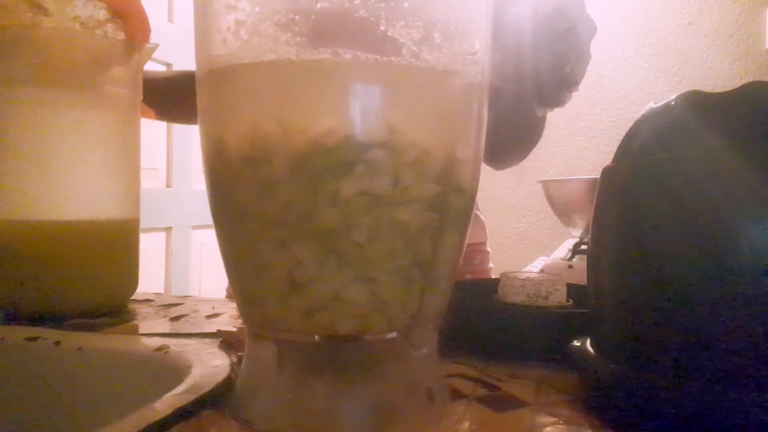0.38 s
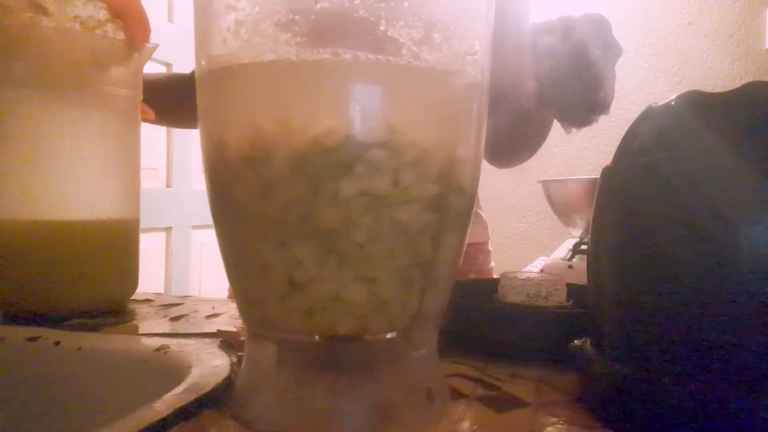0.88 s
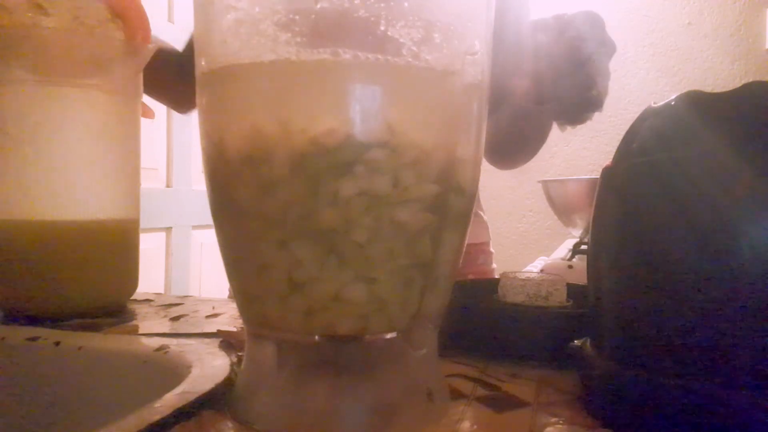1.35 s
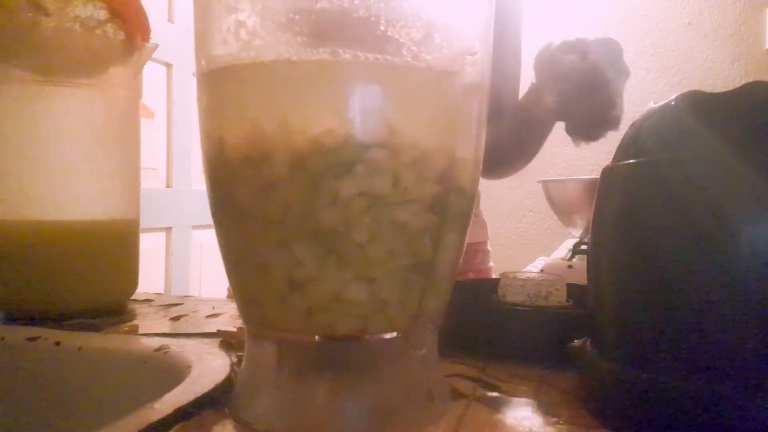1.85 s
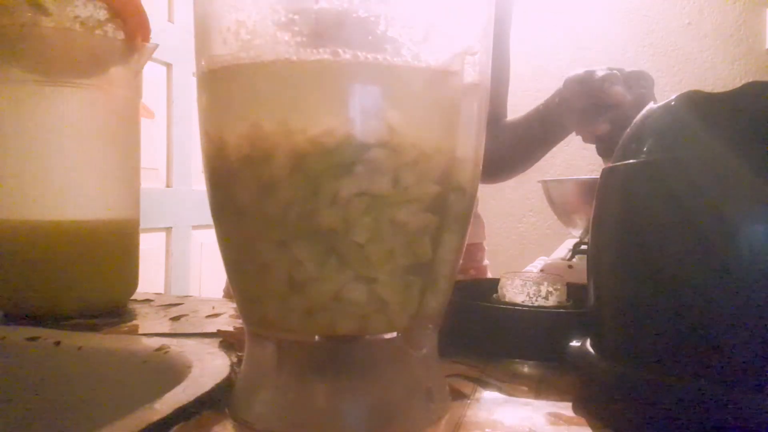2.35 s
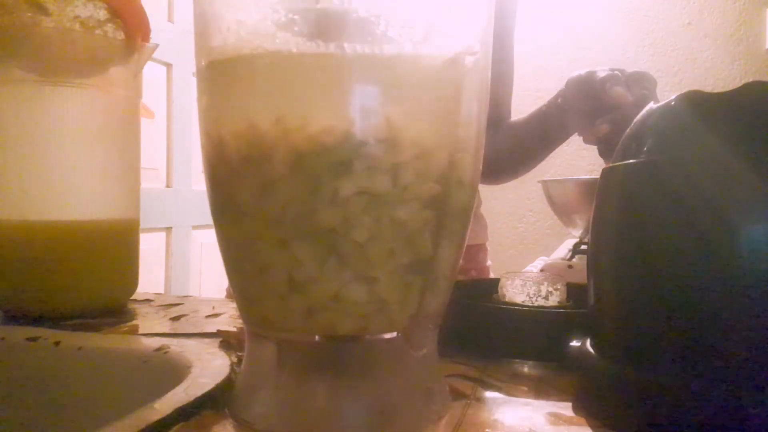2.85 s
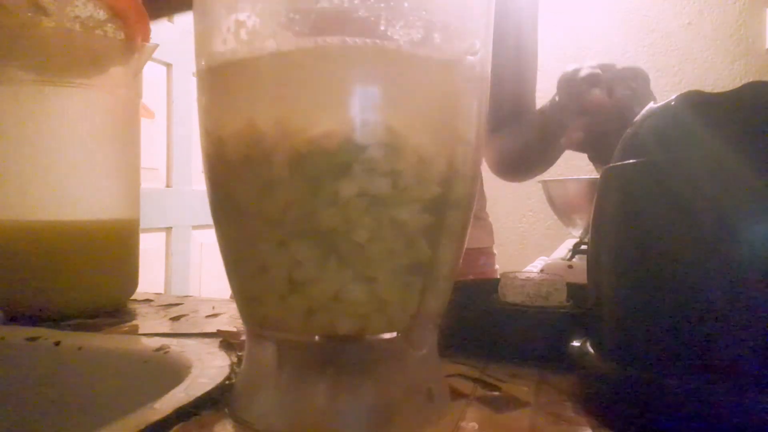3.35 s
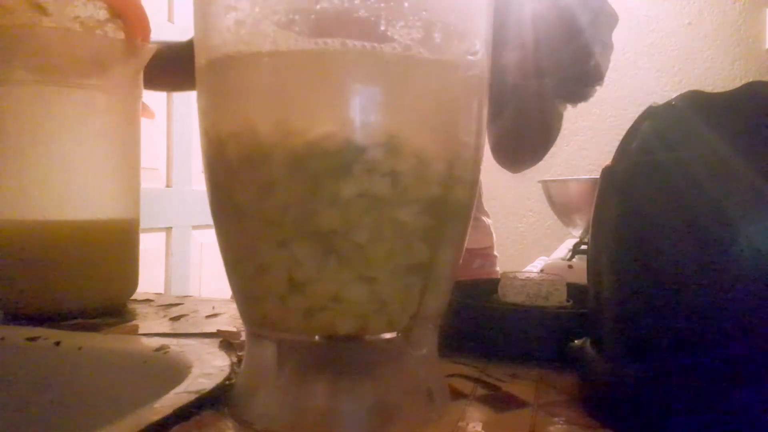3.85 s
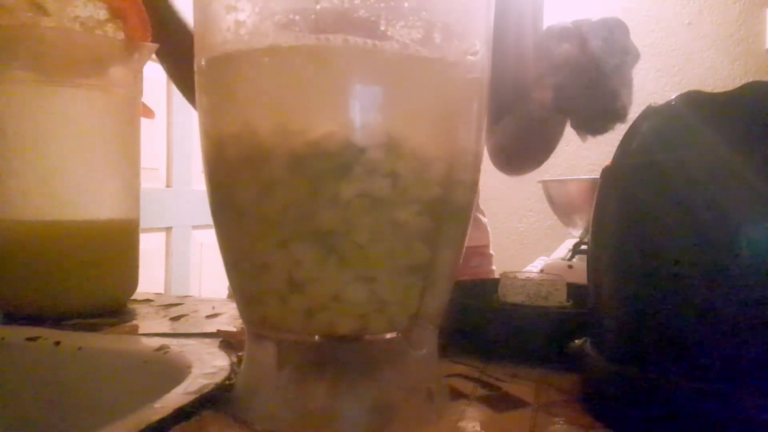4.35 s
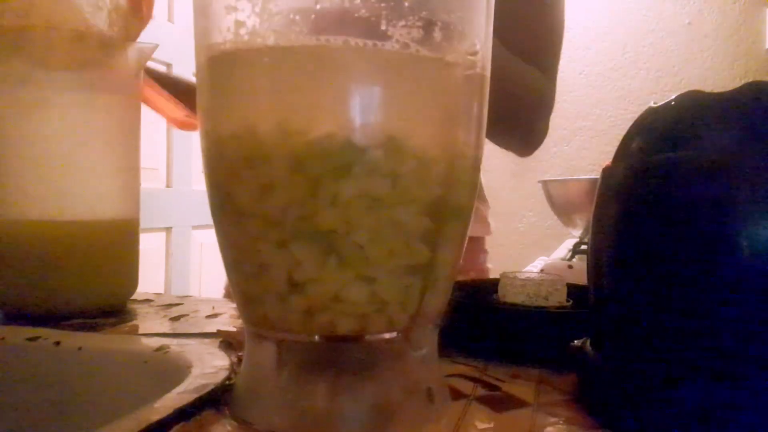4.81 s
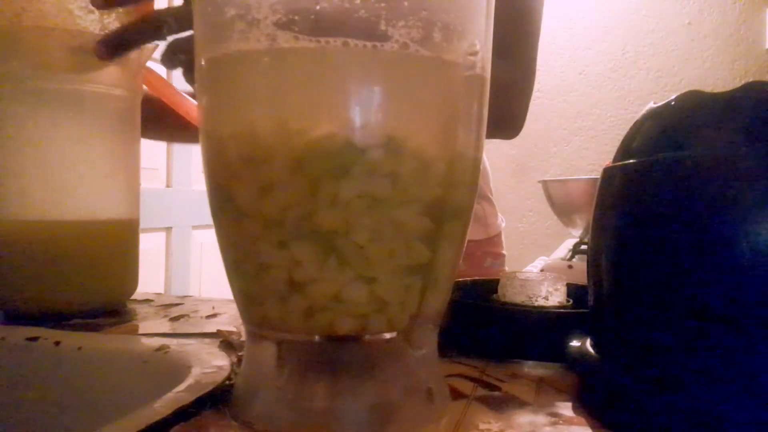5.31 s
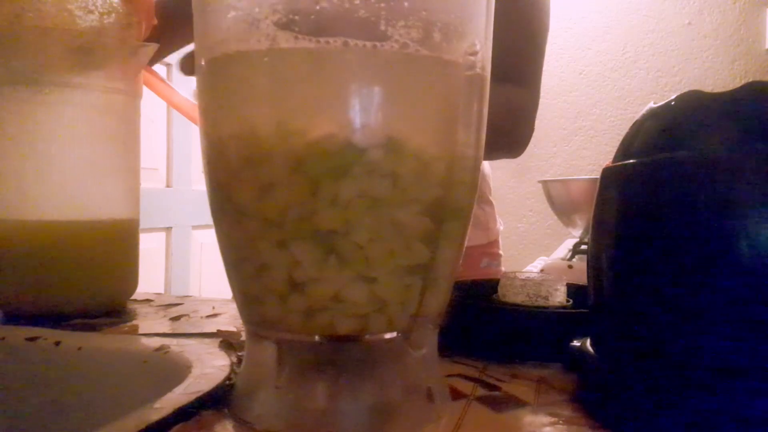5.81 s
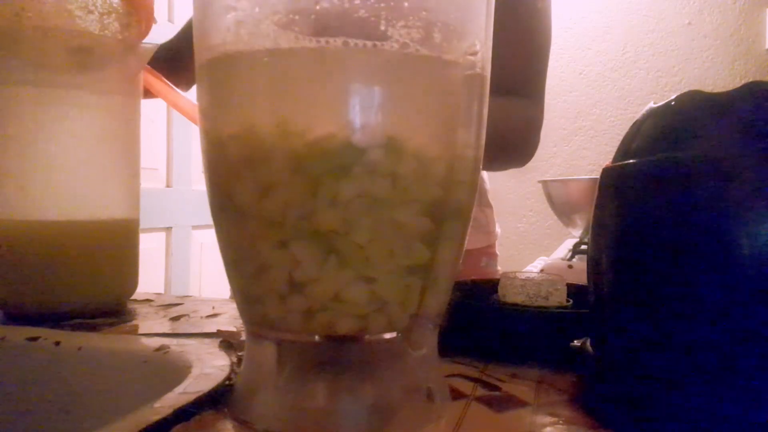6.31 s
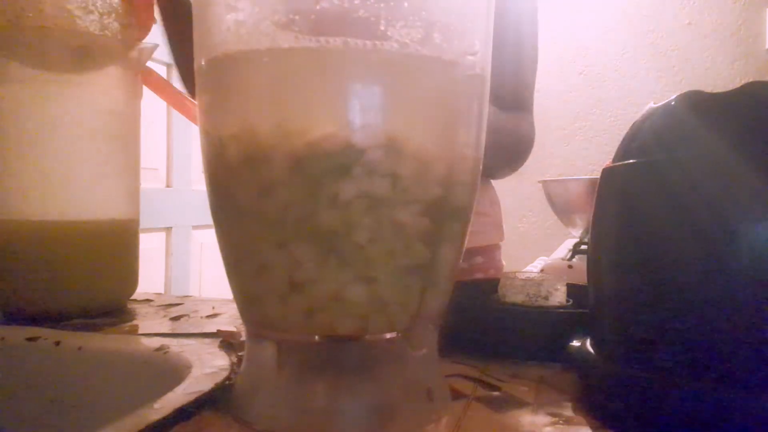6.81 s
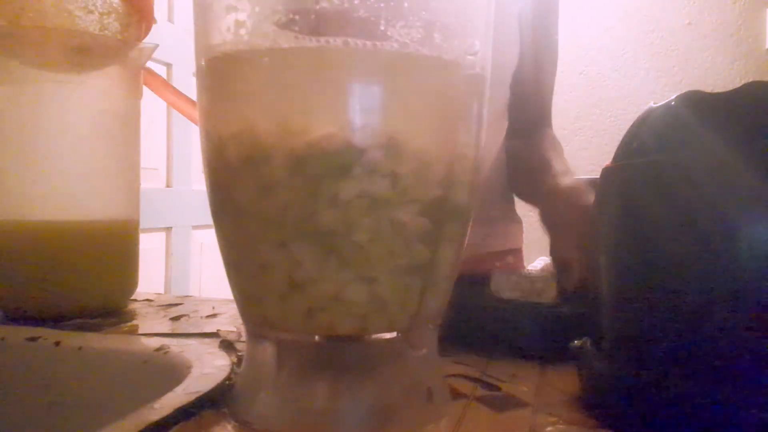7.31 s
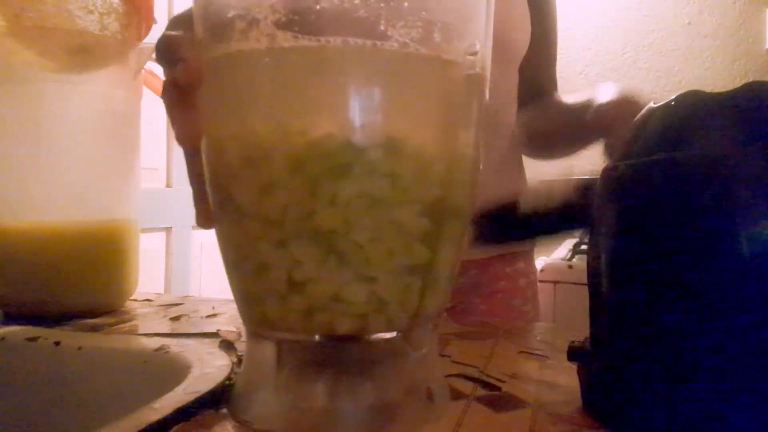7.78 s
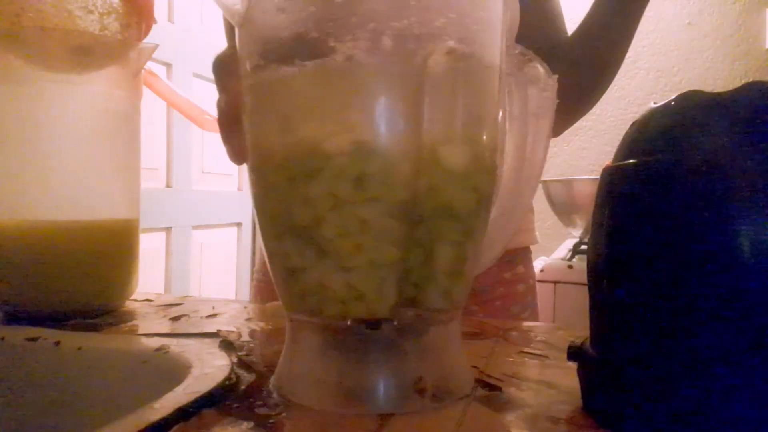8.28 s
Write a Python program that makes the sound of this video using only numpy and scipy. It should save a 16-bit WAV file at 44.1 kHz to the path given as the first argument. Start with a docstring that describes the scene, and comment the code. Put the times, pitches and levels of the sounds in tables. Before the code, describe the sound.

Objects handled on a counter in a small kitchen, picked up by a close microphone with automatic level. Constant dull room rumble and thin hiss. Faint ticks and one soft knock lead to hard thuds, cracks and rattles in the middle, thinning into separate clicks. Another brief scrape and rattle follows, then a bright hollow plastic knock, a duller one, a light rustle and final tiny ticks.

```python
"""A kitchen counter close up: a low, broad room rumble under a faint hiss while hands move a jar, a spoon and a lid.
Blows ring decaying counter modes, thumps two deep ones; contacts click as noise cracks with short modes.
Small parts tick and rattle, friction noise scrapes, and a blender lid of hollow plastic modes knocks twice.
An automatic gain sinks after the loudest blows and creeps back."""
import sys
import numpy as np
from scipy import signal
from scipy.fft import rfft, irfft
from scipy.io import wavfile
from scipy.ndimage import uniform_filter1d

SR = 44100
rng = np.random.default_rng(int(sys.argv[2]) if len(sys.argv) > 2 else 0)


def log_audio(samples):
    """Write samples as a 16-bit WAV file to the path given in sys.argv[1]."""
    # one column per channel
    frames = np.atleast_2d(samples).T
    # limit to full scale, then quantise
    limited = np.clip(frames, -1, 1)
    pcm = np.round(limited * 32767).astype(np.int16)
    wavfile.write(sys.argv[1], SR, pcm)


def volts(x):
    """Linear amplitude factor 10**(x/20) for a level x in dB, scalar or array-like."""
    e = np.asarray(x, float) / 20
    return 10 ** e


N = 381906
T = np.arange(N) / SR
HZ = np.fft.rfftfreq(N, 1 / SR)[1:]

# counter modes: mode_hz, level_db, share of the blow's t60 (ratio)
COUNTER_MODES = [(144, -7, 3), (243, 8.5, 0.4), (285, 5, 1.08), (318, 2, 1.73), (379, 7.5, 0.54),
                 (460, 2.5, 1.14), (560, -1, 0.27), (804, -6.5, 0.59)]
# jar modes, heard in the rattle after contacts: mode_hz, level_db
JAR_MODES = [(900, -8), (1100, -8), (1290, -9.5), (1850, -10), (2150, -12.5), (2480, -13.5), (2800, -12.5),
             (4900, -34)]


def read(table, hz):
    """Table of (Hz, value) read on a log-frequency axis."""
    at, value = np.transpose(table)
    return np.interp(np.log(hz), np.log(at), value)


def unit(x):
    """Scale to rms 1."""
    return x / np.sqrt(np.mean(x ** 2))


def band(x, lo_hz, hi_hz):
    """Band-pass, rms 1."""
    sos = signal.butter(2, [lo_hz, min(hi_hz, 0.49 * SR)], "band", fs=SR, output="sos")
    return unit(signal.sosfilt(sos, x))


def walk(rate_hz):
    """Random levels held 1 / rate_hz and slewed twice, rms 1."""
    hold = int(SR / rate_hz)
    steps = np.repeat(rng.standard_normal(N // hold + 1), hold)
    return unit(uniform_filter1d(uniform_filter1d(steps, hold), hold)[:N])


def sides(pan_db):
    """Left and right gains; pan_db is left minus right."""
    return volts(np.array([[pan_db / 2], [-pan_db / 2]]))


def add(out, start_s, sound):
    """Mix a short sound in at start_s."""
    i = int(start_s * SR)
    out[:, i:i + sound.shape[1]] += sound[:, :N - i]


def ring(hz, t60_s, phase_rad, t):
    """One mode decaying exponentially, t60 at least 5 ms."""
    return np.sin(2 * np.pi * hz * t + phase_rad) * 1000.0 ** (-t / np.maximum(t60_s, 0.005))


def blows():
    """Each blow favours the counter modes near one pitch; a soft push delays the swell."""
    # start_s, level_db, favoured_hz, t60_s (before mode share and choke), push_s
    blow_table = [(2.668, -8.5, 495, 0.11, 0.0024), (3.911, -11.5, 285, 0.12, .0046),
                  (3.957, -16.5, 460, 0.088, 0.0041), (3.993, -16.5, 440, 0.083, 0.0037),
                  (4.028, -17, 390, 0.076, 0.0033), (4.044, -18, 405, 0.1, 0.0033),
                  (4.057, -14.5, 440, 0.042, .003), (4.079, -3.5, 280, 0.087, 0.012),
                  (4.11, -18, 285, 0.1, 0.0045), (4.144, -13.5, 283, 0.15, 0.011),
                  (4.187, -17, 318, 0.11, 0.0071), (4.443, -1.2, 369, 0.14, 0.0014),
                  (4.459, -2, 296.4, 0.14, 0.0048), (4.555, -16, 324, 0.089, .004),
                  (4.7806, 2.5, 293, 0.09, 0.0013), (4.792, 2, 331, 0.13, 0.011),
                  (4.805, -3, 348, 0.08, 0.0033), (4.852, -2.5, 318, 0.12, 0.0088),
                  (4.908, 2, 320, 0.12, 0.0072), (4.921, -11.5, 440, 0.093, 0.0034),
                  (4.965, -13, 328, 0.26, 0.0068), (5.007, -9.5, 320, 0.15, 0.0017),
                  (5.073, -14, 500, 0.095, 0.0024), (5.1372, -10.5, 430, 0.18, 0.0015),
                  (6.038, -7, 308, 0.18, 0.0045), (6.501, -9.5, 352, 0.085, 0.003),
                  (6.512, -6.5, 306, 0.066, 0.0029), (6.547, -14, 294, 0.11, 0.0027),
                  (7.575, -15, 329, 0.088, 0.0066), (7.606, -21, 295, 0.066, 0.0051),
                  (8.095, -21.5, 266, 0.12, 0.0022)]
    left_lead_s = 0.00016  # as mode phase
    out, t = np.zeros((2, N)), T[:SR // 2]
    hz, mode_db, share = np.transpose(COUNTER_MODES)[:, :, None]
    chance = rng.standard_normal((len(blow_table), len(COUNTER_MODES), 1))
    for (start_s, db, near_hz, t60_s, push_s), c in zip(blow_table, chance):
        reach_db = np.maximum(-80 * np.abs(np.log2(hz / near_hz)), -18)
        gain = volts(mode_db + reach_db)
        tuned_hz = hz * (1 + 0.0047 * c)
        sound = np.array([np.sum(gain * ring(tuned_hz, t60_s * share, 2 * np.pi * hz * lead_s, t), axis=0)
                          for lead_s in (left_lead_s, 0)])
        swell = 1 - np.exp(-t / push_s)
        # the hand stays on the piece and chokes the ring
        choke = 0.22 + np.exp(-(t / (0.31 * t60_s)) ** 2)
        sound = sound * swell * choke
        add(out, start_s, volts(db) * sides(-5.0) * sound / np.abs(sound).max())
    return out


def thumps():
    """Something heavy is set down: two deep modes near 74 and 135 Hz, slow to swell."""
    # start_s, level_db, 74 Hz mode over the 135 Hz mode (db)
    thump_table = [(2.668, -12, -24), (4.442, -8.5, -22), (4.783, -5, -10.5), (5.007, -20, 0.5),
                   (6.549, -28, -1), (7.576, -33, 1), (8.096, -13, -14)]
    out, t = np.zeros((2, N)), T[:SR // 2]
    swell = 1 - np.exp(-(t / 0.0036) ** 2)
    for (start_s, db, deep_db), c in zip(thump_table, rng.standard_normal((len(thump_table), 2))):
        deep = volts(deep_db) * ring(74 * (1 + 0.051 * c[0]), 1.0, 0, t)
        upper = ring(135 * (1 + 0.032 * c[1]), 0.22, 0, t)
        add(out, start_s, volts(db) * sides(-4.0) * (deep + upper) * swell)
    return out


def lid():
    """Hollow plastic modes, out of step at the two ports, with a short room tail."""
    # start_s, level_db, bright_db (per octave above 800 Hz), left minus right (db)
    knock_table = [(7.384, 0, -0.5, -5), (7.575, -5, -16, -5.5)]
    # mode_hz, level_db (before brightness), t60_s (before damping)
    lid_modes = [(560, -8, .018), (720, 0, .016), (880, -19, .07), (960, -3, .014), (1200, -8, .014),
                 (1450, -12, .014), (1960, -16, .035), (2830, -24, .015), (6800, -42, .02)]
    out, t = np.zeros((2, N)), T[:SR // 4]
    hz, mode_db, t60_s = np.transpose(lid_modes)[:, :, None]
    chance = rng.standard_normal((len(knock_table), 2, len(t)))
    for (start_s, db, bright_db, pan_db), c in zip(knock_table, chance):
        gain = volts(mode_db + bright_db * np.maximum(np.log2(hz / 800), 0))
        # a dull, soft contact also damps the ring and slows the onset
        held_s = t60_s * volts(bright_db / 8)
        onset = 1 - np.exp(-(t * volts(bright_db / 4) / 0.001) ** 2)
        sound = np.array([np.sum(gain * ring(hz, held_s, lag_rad, t), axis=0) for lag_rad in (1.6, 0)])
        sound = sound * onset
        tail = volts(-24 + bright_db / 2) * band(c, 750, 1400) * 1000.0 ** (-t / 0.25)
        add(out, start_s, volts(db) * sides(pan_db) * (sound / np.abs(sound).max() + tail))
    return out


def clicks():
    """Hard contacts: a crack with a noisy tail in three bands and a short mode cluster of the touched piece."""
    # start_s, level_db, ring_hz, ring_db (re level), top_octave_db (re level)
    click_table = [(1.084, -49, 2410, 9, -3), (1.28, -36.5, 1760, -9, -4), (1.586, -42, 8850, 7, -8),
                   (1.79, -45, 9100, 9, -10), (1.862, -35.5, 5000, -11, -1), (2.099, -36.5, 1640, -20, 1),
                   (2.25, -38.5, 5160, 0, -10), (2.531, -47, 2630, 10, 1), (2.612, -40.5, 2880, 6, -2),
                   (2.615, -34, 1053, 7.5, -10), (2.661, -34.5, 6130, 6, -2), (2.668, -25, 3020, -20, 8),
                   (2.754, -40, 4130, 1, 0), (2.9971, -40.5, 2780, -1, -7), (3.0554, -35, 4940, -3, -3),
                   (3.114, -36.5, 1570, -17, -1), (3.903, -36, 2670, -2, 2), (3.96, -25.5, 6040, 4, -2.2),
                   (3.995, -33, 4500, 2, -1), (4.049, -24, 4900, -14, -10), (4.0526, -30, 3000, -3, -1),
                   (4.077, -28, 2550, -6, 2), (4.17, -40, 1630, -4, 4), (4.441, -12.5, 2500, -30, -6),
                   (4.447, -17.5, 3000, -27, -9), (4.5213, -29.5, 4100, -4, -1),
                   (4.78, -13.5, 1767, -12, 2), (4.803, -28, 790, 6, -20), (4.8512, -32, 1600, 6, -15),
                   (4.939, -30, 1270, 6, -20), (4.974, -32.5, 1230, 0.5, -3), (4.9066, -21, 2100, 4, 2.5),
                   (4.909, -30, 1220, 8, -20), (5.008, -24.5, 1860, -10, -3.5), (5.0744, -22, 2252, -3, -3),
                   (5.133, -17, 4000, -16, 2), (5.136, -27, 5180, 6, -8), (5.166, -24, 1900, -2, -12),
                   (5.2027, -23.5, 2470, 2.5, -10), (5.261, -42, 5230, 2, -10), (5.312, -34, 4330, -4, -8),
                   (5.338, -29, 2390, 2.5, -41), (5.5, -24.5, 5660, 4.5, 0), (5.8162, -30.5, 2020, -9, -2),
                   (6.0367, -23, 2440, 3, -16), (6.416, -26, 6730, -7, 7), (6.445, -35, 11500, 0, 6),
                   (6.47, -29, 2905, -16, 6), (6.478, -35.5, 2850, 10.5, -6), (6.48, -35, 5000, 7, -6),
                   (6.499, -34, 2860, 11, -6), (6.511, -19, 4760, -8, -4), (6.6159, -36.5, 2300, 0, -14),
                   (7.662, -37, 1670, -1.5, -23), (7.875, -38, 5100, -2, -12),
                   (8.432, -26.5, 4600, -28, -5), (8.522, -43, 5100, 4, 5)]
    tail_t60_s = 0.22
    low_db_at_2k, low_db_per_octave = 2, -5.5  # smaller pieces have less low body
    body_db_per_octave = -7  # above 2.5 kHz ring pitch
    size = SR // 2
    out, t = np.zeros((2, N)), T[:size]
    chance = rng.standard_normal((len(click_table), 4, 2, size))
    spread = rng.standard_normal((len(click_table), 4, 1, 1))
    chatter = volts(3.0 * walk(200.0))  # the piece chatters as it settles
    lag_rad = np.array([[1.8], [0]])  # the ports hear the modes out of step
    tail = 1000.0 ** (-t / tail_t60_s)
    onset = 1 - np.exp(-t / 0.00058)
    for (start_s, db, hz, ring_db, top_db), c, off in zip(click_table, chance, spread):
        i = int(start_s * SR)
        crack = 0.44 * tail * np.resize(chatter[i:i + size], size) + 0.52 * np.exp(-t / 0.0036)

        body = 0.74 * band(c[0], 1050, 6240)
        for jar_hz, jar_db in JAR_MODES:
            body = body + volts(jar_db) * band(c[0], 0.97 * jar_hz, 1.03 * jar_hz)
        body = body * volts(body_db_per_octave * max(np.log2(hz / 2500), 0))
        body = body + 0.57 * band(c[3], 0.74 * hz, 1.5 * hz)
        low = volts(low_db_at_2k + low_db_per_octave * np.log2(hz / 2000)) * band(c[1], 330, 1600)
        top = volts(top_db) * band(c[2], 10340, 14400) * tail ** 0.5
        noise = body + low + top

        short_s = 0.25 * tail_t60_s * min(2500 / hz, 1)  # high modes die sooner
        near = np.sum(ring(hz * (1 + 0.06 * off), short_s, lag_rad + 3 * off, t), axis=0)
        cluster = ring(hz, short_s, lag_rad, t) + 0.85 * near
        buzz = 0.26 * band(c[3], 0.89 * hz, 1.12 * hz) * tail  # the piece buzzes on near its pitch
        cluster = 2 * cluster / np.abs(cluster).max() + buzz
        add(out, start_s, volts(db) * sides(-2.3) * (crack * noise + volts(ring_db) * cluster) * onset)
    return out


def ticks():
    """Dry ticks of small hard parts: a 5 ms ring near one pitch with a short bright crack."""
    # start_s, level_db, pitch_hz
    tick_table = [(8.412, -21, 4830), (8.433, -16, 4400)]
    out, t = np.zeros((2, N)), T[:SR // 20]
    lag_rad = np.array([[0], [0.6]])
    for (start_s, db, hz), c in zip(tick_table, rng.standard_normal((len(tick_table), 2, len(t)))):
        crack = 0.2 * band(c, 0.36 * hz, 3 * hz) * np.exp(-t / 0.003)
        add(out, start_s, volts(db) * sides(-7.0) * (ring(hz, 0.005, lag_rad, t) + crack))
    return out


def rattles():
    """Handled loose pieces: small random knocks, each a chance mix of jar and counter modes."""
    # start_s, length_s, level_db (before knock spread)
    rattle_table = [(3.877, 0.33, -41), (4.455, 0.11, -31), (4.785, 0.24, -28.5), (5.062, 0.2, -26.5),
                    (5.305, 0.099, -28), (6.468, 0.25, -32.5)]
    knocks_per_s, spread_db = 320, 1.8
    t, level = T[:SR // 8], np.zeros(N)
    for start_s, length_s, db in rattle_table:
        level += volts(db) * np.clip(np.minimum(T - start_s, start_s + length_s - T) / 0.024, 0, 1)
    modes = [(hz, db, 0.03) for hz, db in JAR_MODES]  # Hz, dB, t60 s
    modes += [(hz, -8.5, 0.06) for hz, _, _ in COUNTER_MODES[1:-1]]
    hits = rng.random(N) < knocks_per_s / SR
    knocks = hits * volts(spread_db * rng.exponential(size=N)) * level
    onset = 1 - np.exp(-t / 0.0012)
    out = 0
    for hz, db, t60_s in modes:
        lag_rad = np.array([[min(hz / 1000, 1.8)], [0]])  # the ports agree in the bass only
        mode = ring(hz, t60_s, lag_rad, t) * onset
        struck = [knocks * rng.standard_normal(N)]
        out = out + volts(db) * signal.fftconvolve(struck, mode, axes=1)[:, :N]
    return out * sides(-6.5)


def flutter(centres_hz):
    """Noise bands, each with its own fast random level; rms 1."""
    out = 0
    for hz in centres_hz:
        out = out + band(rng.standard_normal((2, N)), hz, 1.6 * hz) * volts(5.0 * walk(170.0))
    return unit(out)


def scrapes():
    """Rubbing and rustling: uneven friction noise whose strokes swell and fade."""
    # start_s, length_s, level_db, top_octave_db (re level)
    scrape_table = [(0.805, 0.09, -43, -3), (1.12, 0.14, -46, -4), (1.565, 0.15, -48, 4.5),
                    (3.618, 0.049, -44.5, 4.5), (3.908, 0.23, -36.5, -8), (4.444, 0.15, -43.5, 10),
                    (5.123, 0.049, -33, 4.5), (5.166, 0.11, -47, -18), (5.297, 0.12, -43, -45),
                    (5.466, 0.075, -40, -20), (6.426, 0.063, -54, 18), (6.486, 0.081, -27, -8),
                    (7.9, 0.41, -45.5, -1)]
    rise_share, range_db = 0.32, 5.5  # part of a stroke spent swelling; ends under its peak
    body, top = flutter([1430, 2110, 3080, 4700]), flutter([7500, 10500])
    out = 0
    for start_s, length_s, db, top_db in scrape_table:
        edge = np.clip(np.minimum(T - start_s, start_s + length_s - T) / 0.011, 0, 1)
        stroke_db = np.interp((T - start_s) / length_s, [0, rise_share, 1], [-range_db, 0, -range_db])
        out = out + edge * volts(db + stroke_db) * (body + volts(top_db) * top)
    return out * sides(-1.6)


def diffuse(db, centres_hz, swell_db, flicker_db, flicker_hz):
    """Two-port noise of a given colour; octave bands swell together and flicker alone."""
    # band_hz, correlation of the two ports (-1..1)
    likeness_table = [(60, 1), (250, 0.93), (450, 0.95), (650, -0.76), (1300, -0.046), (3000, -0.04)]
    # band_hz, left minus right (db)
    lean_table = [(60, 3.5), (110, -2.5), (200, -1), (380, -4), (700, -5), (1290, -0.5), (2380, -1),
                  (4400, -2.5), (8120, -1.5), (15000, -4.5)]
    a, b = rfft(rng.standard_normal((2, N)))[:, 1:]
    like = np.clip(read(likeness_table, HZ), -1, 1)
    mid, side = a * np.sqrt(1 + like), b * np.sqrt(1 - like)
    lean_db = read(lean_table, HZ) / 2
    pair = np.array([(mid + side) * volts(db + lean_db), (mid - side) * volts(db - lean_db)])
    out, swell = 0, walk(0.537)
    for centre_hz in centres_hz:
        share = np.cos(np.pi / 2 * np.clip(np.log2(HZ / centre_hz), -1, 1)) ** 2
        part = irfft(np.pad(pair * share, ((0, 0), (1, 0))), N)
        out = out + part * volts(swell_db * swell + flicker_db * walk(flicker_hz))
    return unit(out)


def room_rumble():
    """A low, broad rumble lifted at the resonances of room and counter, under a faint airy hiss."""
    # rumble colour: band_hz, relative density_db (per Hz)
    rumble_table = [(20, -46), (32, -22), (52, -28.5), (66, -13), (78, -14), (128, -3.5), (178, -15),
                    (248, -10), (311, -4.5), (345, -9.5), (533, -18.5), (570, -19.5), (680, -22),
                    (858, -20.5), (1350, -24.5), (1880, -30.5), (3500, -48), (5000, -73)]
    # room and counter resonances: centre_hz, width_hz, lift_db
    boom_table = [(93, 13.5, 9), (126.8, 30, 4.5), (150.7, 12.4, 5), (214.3, 27, 5.5), (285, 9, 1.5),
                  (313.2, 10.6, 4), (854, 20, 5), (1373, 37, 5.5)]
    # hiss colour: band_hz, relative density_db (per Hz)
    hiss_table = [(1180, 2), (2000, -3), (2530, 1), (3190, -4), (4110, -2), (5280, -4.5), (7940, -9),
                  (8890, -7.5), (12300, -2), (15100, -6), (15900, -22)]
    lift_db = sum(db / (1 + (2 * (HZ - hz) / width_hz) ** 2) for hz, width_hz, db in boom_table)
    rumble = diffuse(read(rumble_table, HZ) + lift_db, 24.8 * 2.0 ** np.arange(8), 0.4, 1.6, 6.0)
    hiss = diffuse(read(hiss_table, HZ), 1900.0 * 2.0 ** np.arange(4), 0.15, 1.2, 9.0)
    return rumble * volts(-25) + hiss * volts(-43.5)


def gain_control(x):
    """Slow automatic gain: the louder the last second was, the lower the gain."""
    start_db, cut_db_per_db, stage_s = -26.5, 0.65, 0.35  # stage_s: each of two smoothing stages
    start_power = volts(2 * start_db)
    keep = np.exp(-1 / (stage_s * SR))
    excess = np.mean(x ** 2, axis=0) - start_power
    for _ in range(2):
        excess = signal.lfilter([1 - keep], [1, -keep], excess)
    over_db = 10 * np.log10(np.maximum(1 + excess / start_power, 1))
    return x * volts(-cut_db_per_db * over_db)


def scene():
    """Everything on and around the counter; blows and thumps lose what lies under 55 Hz."""
    high_pass = signal.butter(3, 55, "high", fs=SR, output="sos")
    struck = signal.sosfilt(high_pass, blows() + thumps())
    return struck + lid() + clicks() + ticks() + rattles() + scrapes() + room_rumble()


def band_limit(x):
    """A steep low-pass at the top of the band."""
    return signal.sosfilt(signal.butter(12, 16470, fs=SR, output="sos"), x)


def record(dry):
    """Automatic gain, then tanh rounds the loudest peaks."""
    mix = np.tanh(gain_control(dry))
    return band_limit(mix)


dry = scene()
out = record(dry)
log_audio(out)
```